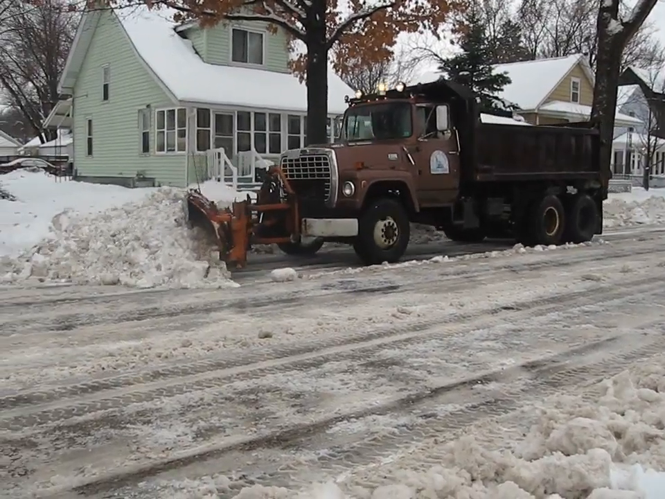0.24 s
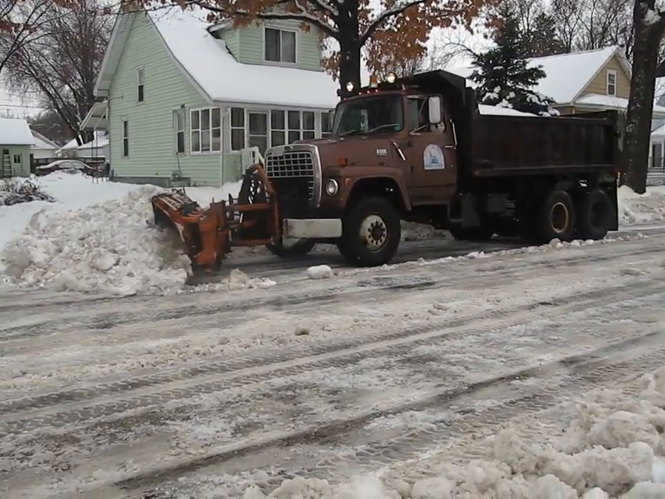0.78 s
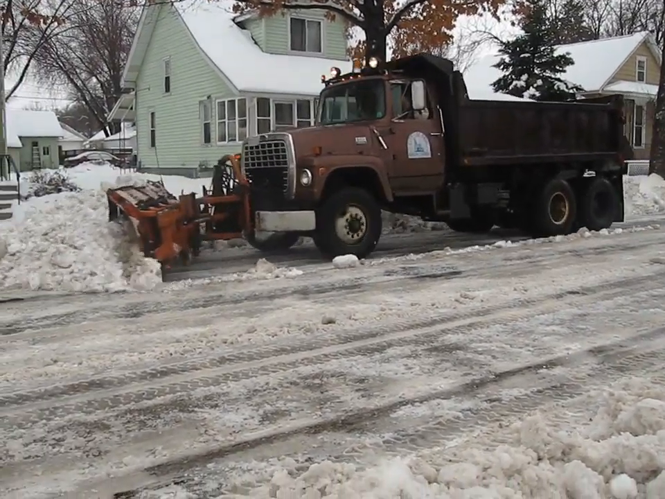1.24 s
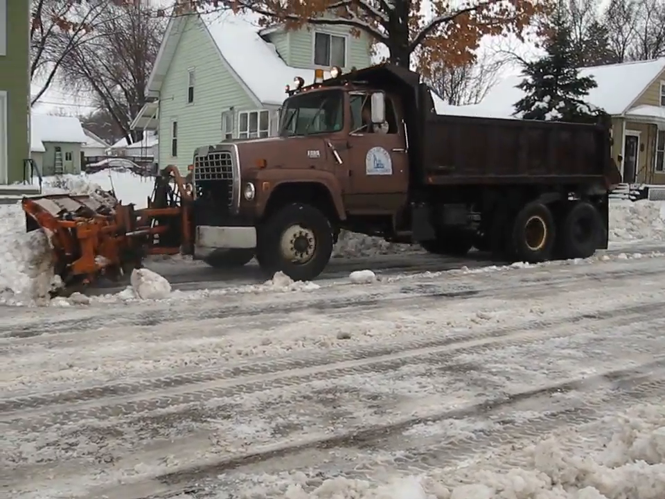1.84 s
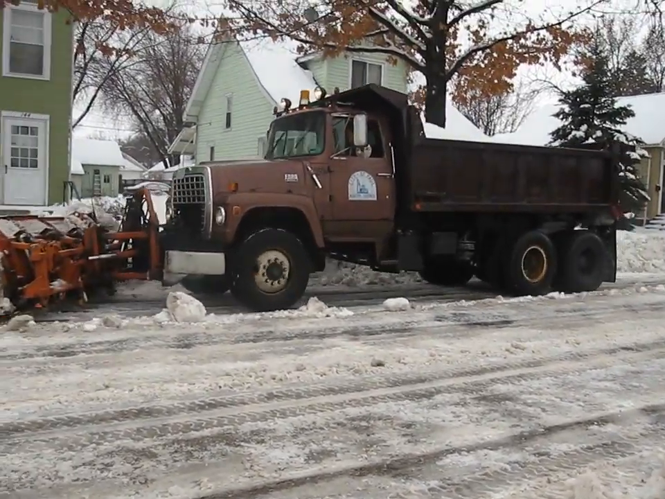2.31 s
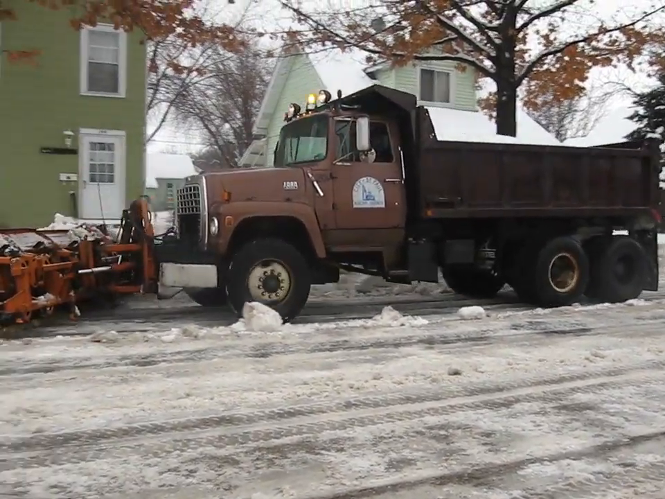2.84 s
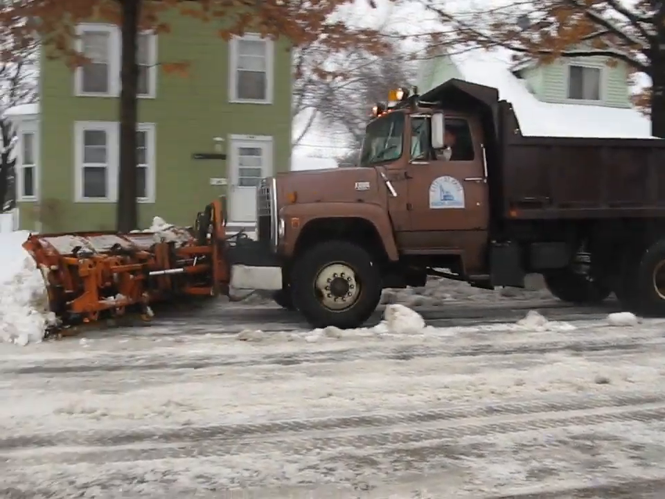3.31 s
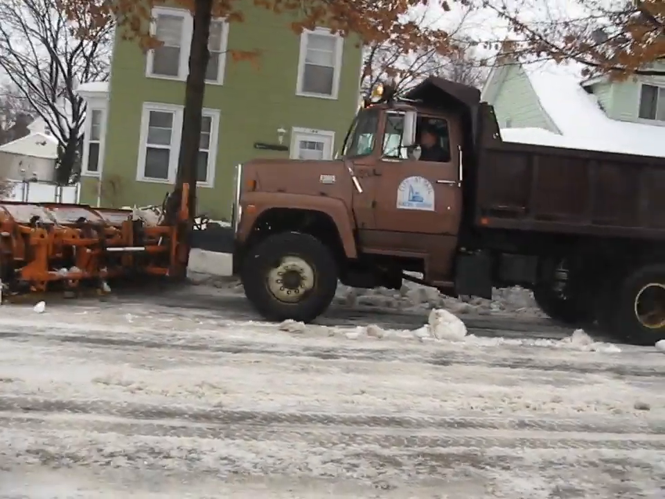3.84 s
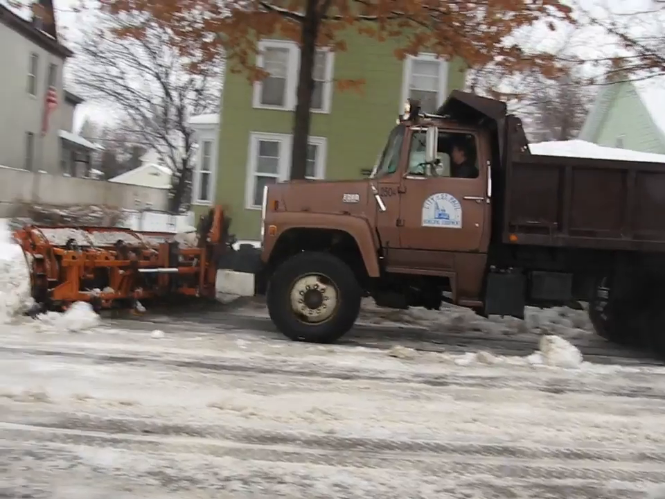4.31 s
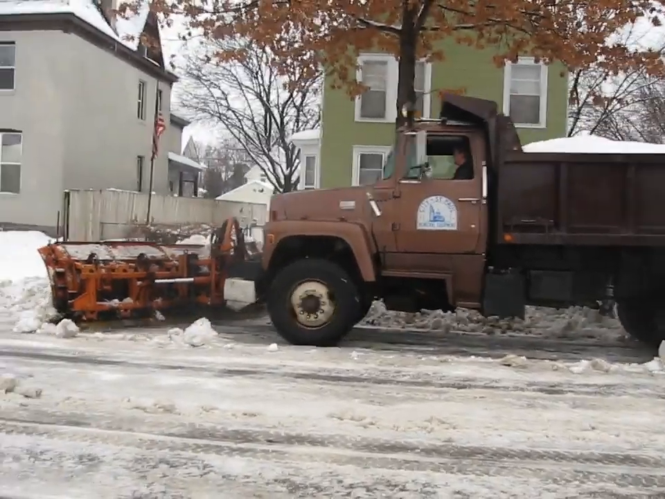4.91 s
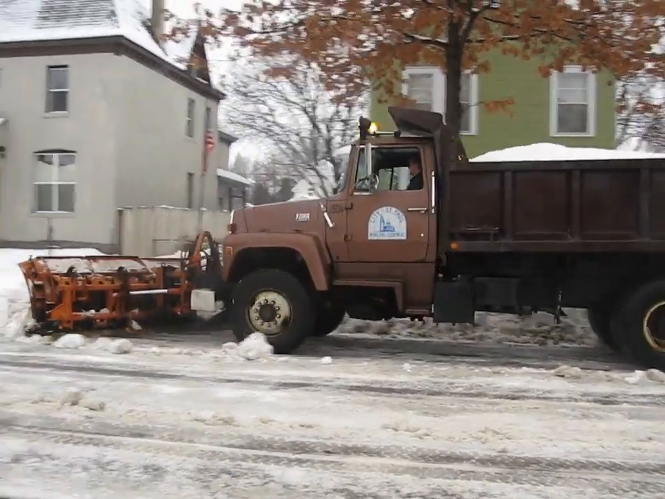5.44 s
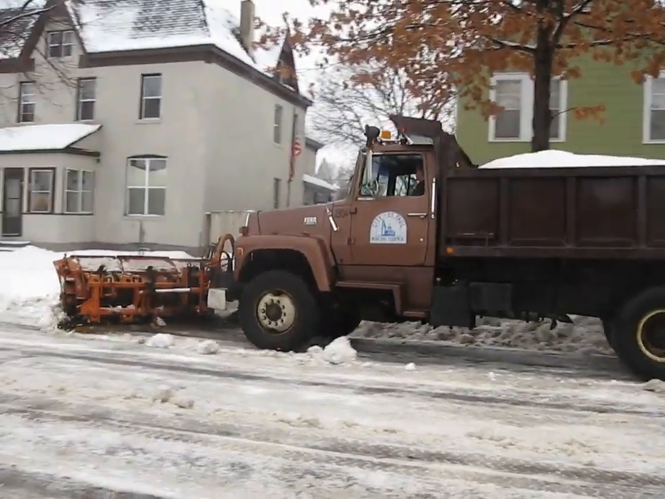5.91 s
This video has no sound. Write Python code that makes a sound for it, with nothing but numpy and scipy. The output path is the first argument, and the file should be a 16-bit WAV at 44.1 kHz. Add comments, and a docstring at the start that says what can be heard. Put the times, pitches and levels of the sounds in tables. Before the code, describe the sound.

A heavy diesel plow truck is already running at 0 s and continues to the end, about 6.2 s, at an almost unchanging engine speed. A low drone near 136 Hz leads at first, with a fan tone, a thin whine around 600 Hz, deep snow-and-tyre rumble, midrange clatter and soft hiss. Rapid dry metallic ticks, uneven within each engine turn, run throughout and are clearest around 3.5 s. From about 1.6 s faint high steel scrapes sing briefly, returning near 2.2, 2.8, 3.2, 4.5 and 6 s, with some harder clicks between 1.7 and 4.5 s. The drone fades around 2.5 s, wavers, dips at 4.4 s, swells near 5.2 s, dips at 5.6 s and returns. Dull plow bumps land at 4.2 s and in a cluster from 5.3 to 5.6 s. Close outdoor kerbside pickup, small microphone, no extreme treble.

```python
"""A six-cylinder diesel plow truck creeps past at a governed speed, pushing snow along a street of houses.
From the outset sines at multiples of crank speed hum and whine, filtered noise gives rumble, clatter, fan air
and hiss, and resonant noise bursts tick in step with the crank.
From 1.6 s narrow resonances of the plow's steel sing in scrapes, a few tones bloom and some ticks ring hard.
From 4.2 s damped sines with a noisy steel knock form the bumps of the plow."""
import sys
import numpy as np
from scipy import signal
from scipy.fft import rfft, irfft
from scipy.io import wavfile

SR = 44100
rng = np.random.default_rng(int(sys.argv[2]) if len(sys.argv) > 2 else 0)


def wav_out(sig):
    """Save sig, one row per channel (or a flat mono array), as 16-bit PCM at SR to the path in sys.argv[1]."""
    wavfile.write(sys.argv[1], SR, np.round(np.clip(np.atleast_2d(sig).T, -1, 1) * 32767).astype(np.int16))


N = 271656
TIME = np.arange(N) / SR  # s
FREQS = np.fft.rfftfreq(N, 1 / SR)  # Hz

# crankshaft speed as heard from the kerb: [t/s, speed/(turns per s)]
CRANK_SPEED = [(0, 22.735), (1.6, 22.735), (2.2, 22.755), (4.5, 22.755), (5.3, 22.71), (6.16, 22.72)]
FAN_ORDER, WHINE_ORDER = 8.2, 27  # multiples of crank speed

# firing tone, an octave under the drone: [t/s, level/dB]
FIRING_LEVEL = [(0.1, -41.5), (1.4, -39.5), (3.47, -54.5), (4.01, -41.5), (5.09, -43), (6.0, -37.5)]
# exhaust drone, which swells and fades as the truck moves between the house fronts: [t/s, level/dB]
DRONE_LEVEL = [(0.05, -21.5), (1.92, -27.5), (2.47, -39), (2.63, -31), (3.29, -32.5), (4.06, -29),
               (4.4, -44), (4.55, -33.5), (5.19, -25), (5.61, -36), (5.64, -46.5), (5.96, -29),
               (6.1, -28.5)]
# exhaust overtone, a fifth above the drone: [t/s, level/dB]
OVERTONE_LEVEL = [(0.05, -40.5), (1.82, -31.5), (2.93, -32), (3.72, -41), (3.89, -32), (4.5, -38),
                  (5.29, -28), (6.1, -47)]
# blade tone of the fan: [t/s, level/dB]
FAN_LEVEL = [(0.05, -28.5), (2.73, -36), (3.81, -30), (4.8, -29.5), (4.85, -27), (6.1, -34.5)]
# whine of the engine: [t/s, level/dB]
WHINE_LEVEL = [(0.05, -32), (0.57, -35), (1.04, -29.5), (1.87, -25.5), (3.3, -47), (4.16, -40), (4.55, -28),
               (5.05, -41), (5.59, -33), (5.74, -42.5), (6.1, -43.5)]

# weaker engine tones: [multiple of crank speed, relative level/dB approaching, passing, leaving]
ENGINE_TONES = [(5, -59, -46.5, -52), (7, -46.5, -45.5, -39), (8, -35, -43.5, -45), (10, -61, -61.5, -45.5),
                (11, -44, -49.5, -43.5), (12, -39, -48, -36), (18, -45, -46, -47), (21, -45, -47, -58),
                (22, -45.5, -55, -63.5), (23, -42, -59, -57), (28, -48.5, -51, -64), (30, -56, -45, -55),
                (33, -37.5, -43.5, -47), (36, -56.5, -45, -40), (39, -49, -47, -44),
                (40, -54.5, -47, -49.5), (41, -55, -59.5, -52), (45, -40, -49.5, -52.5)]
# overtones of the fan: [multiple of blade rate, relative level/dB approaching, passing, leaving]
FAN_OVERTONES = [(2, -54, -52, -43.5), (3, -37, -43, -50), (4, -58, -45.5, -42.5)]
# reflections add up and one weak tone blooms: [t/s, half length/s, f/Hz, level/dB]
TONE_BLOOMS = [(1.66, .35, 273, -37), (2.1, .7, 682, -40), (3.442, 0.3, 910, -39), (3.952, .42, 250, -38),
               (4.45, 0.26, 560, -37.5)]

# rumble of blade and tyres: [t/s, relative level/dB]
RUMBLE_SWELL = [(0.05, -43), (1.51, -39), (3.69, -46), (5.68, -34.5), (5.74, -38.5), (6.1, -34.5)]
# noise from the engine bay: [t/s, relative level/dB]
BAY_SWELL = [(0.05, -31), (0.32, -32.5), (1.3, -31), (3.66, -37), (3.79, -33.5), (5.51, -34.5),
             (6.08, -30.5), (6.1, -32)]
# spectrum of the rumble: [f/Hz, relative level per Hz/dB]
RUMBLE_SPECTRUM = [(10, -34), (25, -13), (45, -6), (100, -1), (180, 1), (260, -0.5), (350, -4.5),
                   (450, -13), (700, -29.5), (1500, -66.5)]
# spectrum of the engine bay noise: [f/Hz, relative level per Hz/dB]
BAY_SPECTRUM = [(200, -30.5), (370, -7.5), (480, -6), (620, 0), (800, 0.5), (1100, -2.5), (1500, -3.5),
                (2000, -8), (2600, -11.5), (4000, -31), (7000, -58.5)]
# spectrum of the hiss: [f/Hz, relative level per Hz/dB]
HISS_SPECTRUM = [(800, -24), (1800, -0.5), (2500, 1), (3100, 2.5), (3800, 2), (4400, 0), (5000, -4),
                 (5600, -11.5), (6200, -16.5), (6700, -33.5), (7100, -51)]

# ticks within one turn of the crank: [share of the turn, relative level/dB]
TICKS_IN_TURN = [(0.091, 2), (.435, -6), (0.768, -6)]
# resonances in which the ticks ring: [f/Hz, half width/Hz, relative level/dB]
TICK_RESONANCES = [(2330, 270, -10.5), (2850, 310, -3), (3595, 430, -0.5), (4340, 250, -3.5),
                   (4920, 250, -7.5), (5440, 320, -10)]
# steel of the plow singing as it scrapes: [t/s, half length/s, f/Hz, half width/Hz, level/dB]
STEEL_SCRAPES = [(1.58, 0.14, 3610, 121, -35), (2.2, .18, 2920, 70, -38), (2.32, 0.13, 3580, 109, -36),
                 (2.778, 0.17, 3580, 88.6, -37), (3.246, .28, 3530, 89, -38),
                 (4.374, 0.13, 3920, 69.4, -35.5), (4.6, 0.24, 4420, 150, -41.5),
                 (6.0, 0.26, 2150, 70, -37.5)]
# the hardest ticks: [t/s, relative level/dB, f/Hz]
HARD_TAPS = [(1.6744, -9, 3550), (2.2897, -13, 2870), (2.422, -14, 3480), (3.3441, -11, 3580),
             (3.476, -13, 3420), (3.5643, -9.5, 3380), (4.0477, -10, 3820), (4.1355, -10.5, 3880),
             (4.222, -16, 3350), (4.5306, -18, 3760)]
# bumps over packed snow: [t/s, relative level/dB, f/Hz, decay/s, level of steel knock re thud/dB]
PLOW_BUMPS = [(4.215, -15.5, 124, .012, -17), (5.289, -13, 170, 0.0098, -11), (5.351, -21, 168, 0.013, -15),
              (5.442, -24, 187, 0.01, -4), (5.613, -18.5, 211, .02, -11)]


def amp(db):
    """Level to amplitude: twenty decibels are a factor of ten."""
    return 10 ** (np.asarray(db) / 20)


def unit(x):
    """Normalisation: scales to rms 1."""
    return x / np.sqrt(np.mean(abs(x) ** 2) + 1e-20)


def curves(rows):
    """Linear interpolation: joins each column of a table by straight lines in time."""
    s, *columns = np.transpose(rows)
    return [np.interp(TIME, s, column) for column in columns]


def passing(levels_db):
    """Linear interpolation: level from approach through passing to leaving."""
    return np.interp(TIME, np.linspace(0, TIME[-1], len(levels_db)), levels_db)


def follow(lead_db, mean_db, share):
    """Partial covariation: a level takes a share of the swings of another."""
    return mean_db + share * (lead_db - lead_db.mean())


def bell(s, half_s):
    """Gaussian envelope: a smooth rise and fall around time s."""
    return np.exp(-((TIME - s) / half_s) ** 2)


def drift(rate):
    """Superposition: sixteen slow sines of random rate up to rate/Hz give a random wander of rms 1."""
    grid = np.linspace(0, TIME[-1], 600)
    speed, start = rng.random((2, 16, 1))
    sines = np.sin(2 * np.pi * (rate * speed * grid + start))
    return np.interp(TIME, grid, unit(sines.sum(0)))


def colour(x, spectrum):
    """Linear filtering: shapes x by a spectrum, at rms 1."""
    hz, db = np.transpose(spectrum)
    gain = amp(np.interp(np.log(FREQS + 1), np.log(hz), db))
    return unit(irfft(rfft(x) * gain, N))


def band(x, hz, half_width):
    """Resonance: a band-pass with steep sides."""
    edges = [hz - half_width, hz + half_width]
    return signal.sosfilt(signal.butter(2, edges, "bandpass", fs=SR, output="sos"), x)


def add(mix, s, sound):
    """Superposition: adds a sound to the mix at time s."""
    part = mix[round(s * SR):][:len(sound)]
    part += sound[:len(part)]


def tone(turns, order, gain, wander):
    """Phase modulation: a sine at a multiple of crank speed wavers with the street's shifting reflections."""
    cycles = order * turns + rng.random() + wander * drift(1.197)
    return np.sqrt(2) * gain * np.sin(2 * np.pi * cycles)


def hum(turns):
    """Harmonics and beats: three firings a turn make the drone; the belt-driven fan beats; the engine whines."""
    parts = [(3, FIRING_LEVEL), (6, DRONE_LEVEL), (9, OVERTONE_LEVEL),
             (FAN_ORDER, FAN_LEVEL), (WHINE_ORDER, WHINE_LEVEL)]
    return sum(tone(turns, order, amp(curves(rows)[0]), wander=0.03) for order, rows in parts)


def weak_tones(turns, level_db=-1, flutter_db=2.0):
    """Interference: faint engine and fan tones change balance in passing and flutter; a few bloom."""
    weak = [(order, db) for order, *db in ENGINE_TONES]
    weak += [(multiple * FAN_ORDER, db) for multiple, *db in FAN_OVERTONES]
    gains = amp([passing(db) + level_db + flutter_db * drift(1.6) for _, db in weak])
    pitches = np.array([order for order, _ in weak]) * CRANK_SPEED[0][1]
    for s, half_s, hz, db in TONE_BLOOMS:
        nearest = np.argmin(abs(pitches - hz))
        gains[nearest] = np.hypot(gains[nearest], amp(db) * bell(s, half_s))
    return sum(tone(turns, order, gain, wander=0.1) for (order, _), gain in zip(weak, gains))


def rumble(level_db=6.0, lumps_db=1.0):
    """Broadband friction noise: blade and tyres rumble with a lumpy level."""
    level = curves(RUMBLE_SWELL)[0] + level_db + lumps_db * drift(4)
    return amp(level) * colour(rng.standard_normal(N), RUMBLE_SPECTRUM)


def clatter(turns, hold_s=0.61):
    """Periodicity: the block rattles alike each turn; the pattern changes slowly with angle to the street."""
    size = round(SR / CRANK_SPEED[0][1])  # samples in one turn
    place = (turns % 1 * size).astype(int)
    moments = np.linspace(0, TIME[-1], 11)
    return unit(sum(rng.standard_normal(size)[place] * bell(s, hold_s) for s in moments))


def bay_noise(turns, bay_db=4.0, flicker_db=0.5):
    """Amplitude modulation: clatter, fan air and hiss throb slightly with the firings."""
    bay = curves(BAY_SWELL)[0]
    hiss = follow(bay, mean_db=-32, share=0.61)  # rises and falls with the bay, but less
    firing = np.cos(2 * np.pi * 3 * (turns - TICKS_IN_TURN[0][0]) - 1)
    # level/dB, spectrum, power share of the repeating clatter, depth of throb
    layers = [(bay + bay_db, BAY_SPECTRUM, 0.42, 0.02), (hiss, HISS_SPECTRUM, 0.25, 0.092)]
    out = np.zeros(N)
    for level_db, spectrum, share, depth in layers:
        air = rng.standard_normal(N)
        source = np.sqrt(share) * clatter(turns) + np.sqrt(1 - share) * air
        throbbing = source * (1 + depth * firing)
        out += amp(level_db + flicker_db * drift(25)) * colour(throbbing, spectrum)
    return out


def ticks(turns, snap_s=0.00094, rattle_s=0.0082, rattle_db=-7.0, scatter_db=1.6, mode_scatter_db=1.7,
          jitter_s=0.0004, level_db=-34, facing_s=3.47, half_span_s=3.15, edge_db=-5):
    """Impact excitation: crank-locked metal taps rattle briefly, each with its own mix of resonances."""
    count = int(turns[-1])
    t = np.arange(SR // 25) / SR
    snap = np.exp(-t / snap_s)
    rattle = amp(rattle_db) * np.exp(-t / rattle_s)
    burst_power = snap ** 2 + rattle ** 2
    when = np.concatenate([np.interp(np.arange(count) + share, turns, TIME) for share, _ in TICKS_IN_TURN])
    when += jitter_s * rng.standard_normal(len(when))
    at = np.clip(when * SR, 0, N - 1).astype(int)
    force_db = np.repeat([db for _, db in TICKS_IN_TURN], count) + scatter_db * rng.standard_normal(len(at))
    out = np.zeros(N)
    for hz, half_width, db in TICK_RESONANCES:
        power = np.zeros(N)
        power[at] = amp(force_db + db + mode_scatter_db * rng.standard_normal(len(at))) ** 2
        envelope = np.sqrt(abs(signal.oaconvolve(power, burst_power)[:N]))
        drive = envelope * rng.standard_normal(N)
        out += band(drive, hz, half_width) / np.sqrt(half_width)
    # loudest while the side of the engine faces the kerb
    turned_away = ((TIME - facing_s) / half_span_s) ** 2
    return amp(level_db + edge_db * turned_away) * unit(out)


def scrapes(turns, grit_db=3.5, shake_db=3.5):
    """Friction-driven resonance: uneven rubbing, shaken once a turn by the engine, makes the steel ring."""
    shake = np.cos(2 * np.pi * (turns - TICKS_IN_TURN[0][0]))
    friction = rng.standard_normal(N) * amp(grit_db * drift(40) + shake_db * shake)
    out = np.zeros(N)
    for s, half_s, hz, half_width, db in STEEL_SCRAPES:
        out += amp(db) * bell(s, half_s) * unit(band(friction, hz, half_width))
    return out


def taps(ring_s=0.0019, half_width_hz=380, level_db=-5.0):
    """Selective excitation: now and then a tick lands hard and rings mostly in one resonance."""
    out, t = np.zeros(N), np.arange(SR // 40) / SR
    for s, db, hz in HARD_TAPS:
        ring = band(rng.standard_normal(len(t)) * np.exp(-t / ring_s), hz, half_width_hz)
        add(out, s, amp(db + level_db) * ring / abs(ring).max())
    return out


def bumps(knock_s=0.0088, rise_s=0.002):
    """Damped oscillation: each bump is a dull, quickly decaying thud with a knock of the steel blade."""
    out, t = np.zeros(N), np.arange(SR // 5) / SR
    for s, db, hz, decay_s, knock_db in PLOW_BUMPS:
        thud = np.sin(2 * np.pi * hz * t) * np.exp(-t / decay_s) * (1 - np.exp(-t / rise_s))
        knock = unit(band(rng.standard_normal(len(t)), 670, 310)) * np.exp(-t / knock_s)
        add(out, s, amp(db) * (thud + amp(knock_db) * knock))
    return out


def scene():
    """Superposition: the turning crankshaft drives the engine sounds; the plow adds scrapes and bumps."""
    turns = np.cumsum(curves(CRANK_SPEED)[0]) / SR
    engine = hum(turns) + weak_tones(turns) + bay_noise(turns) + ticks(turns) + taps()
    plow = rumble() + scrapes(turns) + bumps()
    return (engine + plow)[None]


def record(dry, edge_hz=6950):
    """Band limitation: a small microphone passes only what lies below its upper edge."""
    lowpass = signal.firwin(401, edge_hz, window=("kaiser", 9), fs=SR)
    return signal.oaconvolve(dry, lowpass[None], "same")


dry = scene()
out = record(dry)
wav_out(out)
```